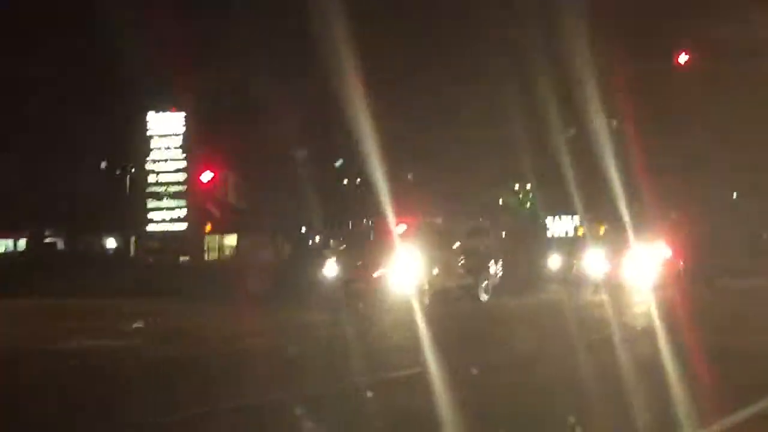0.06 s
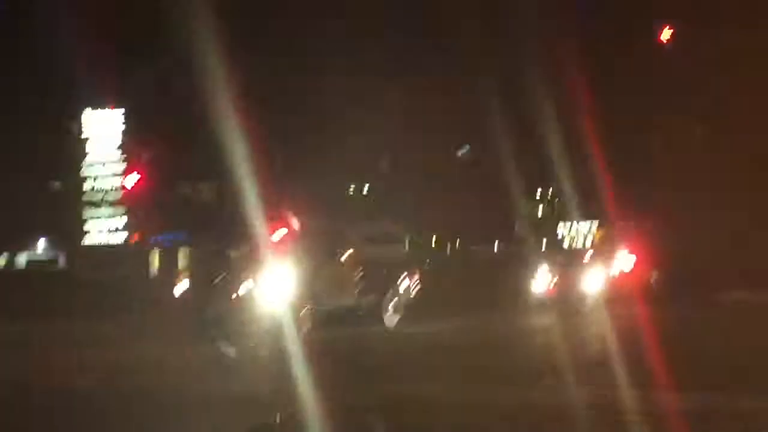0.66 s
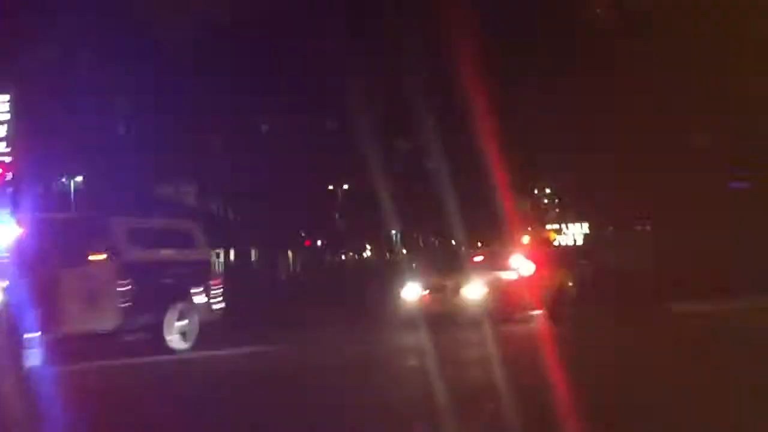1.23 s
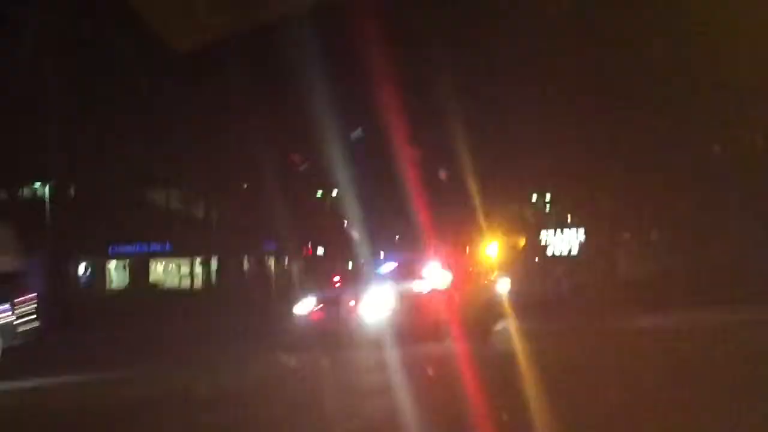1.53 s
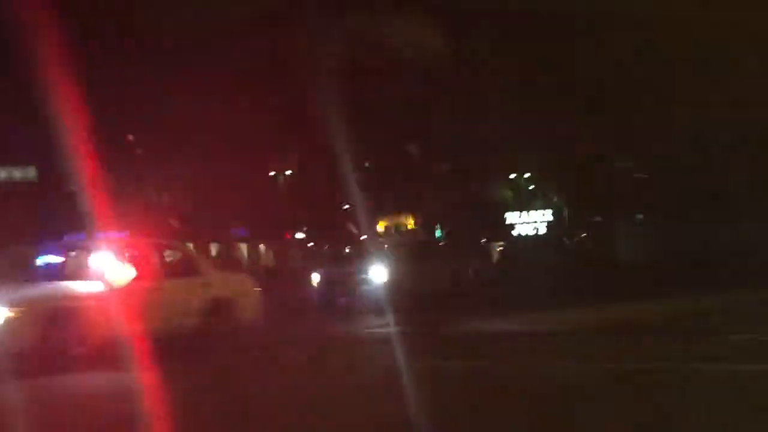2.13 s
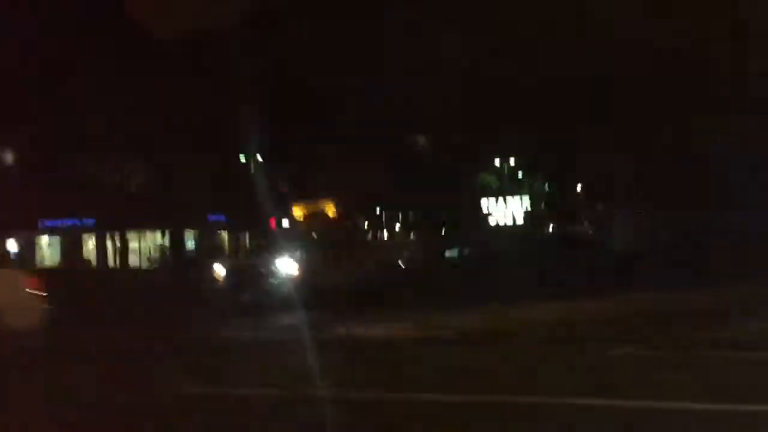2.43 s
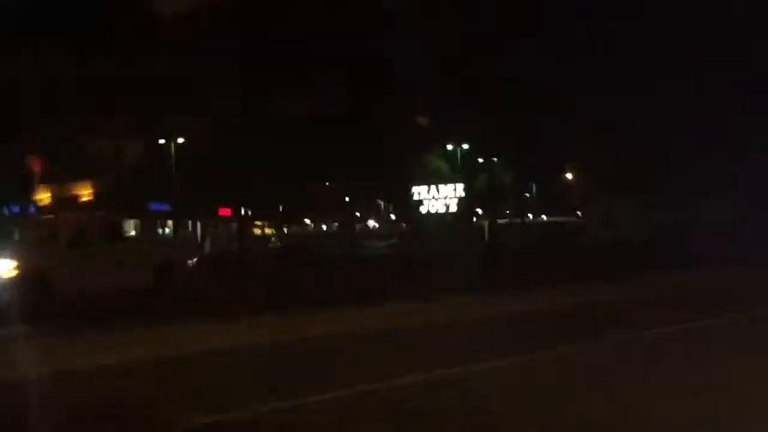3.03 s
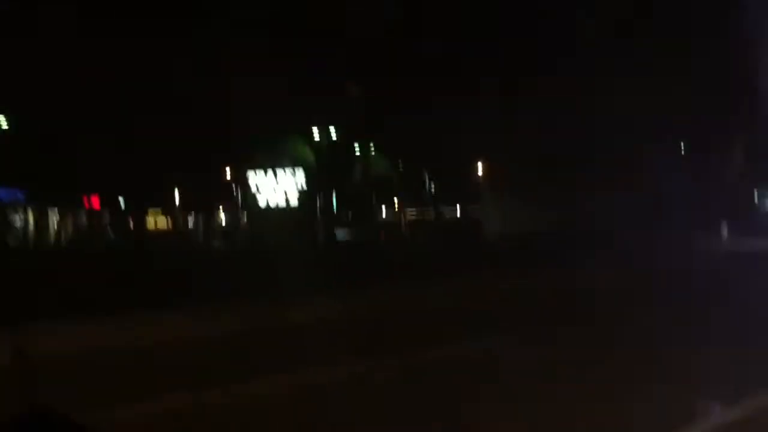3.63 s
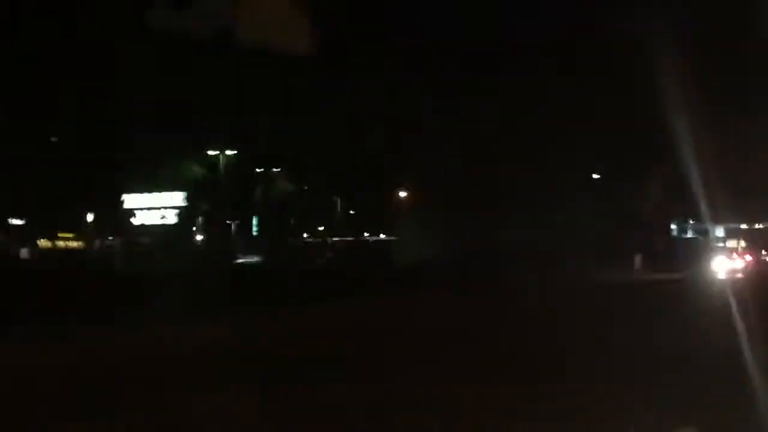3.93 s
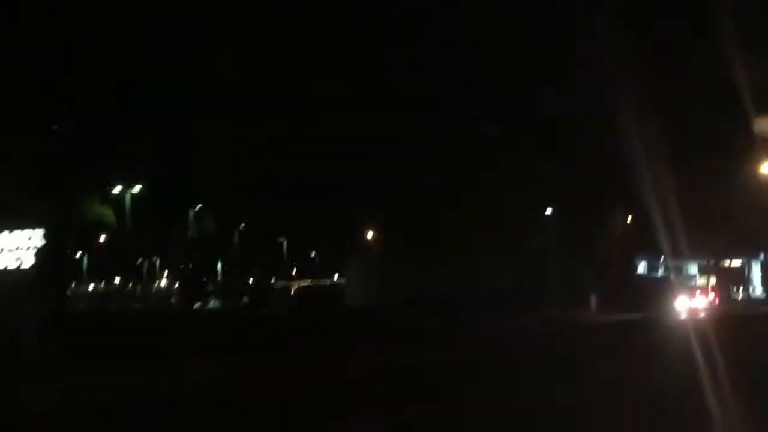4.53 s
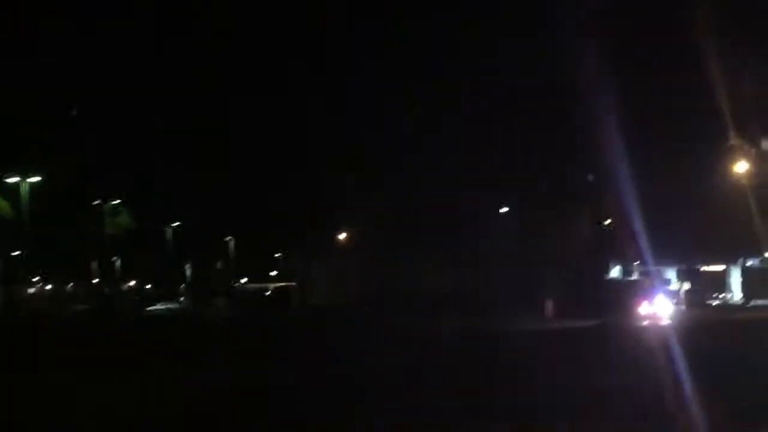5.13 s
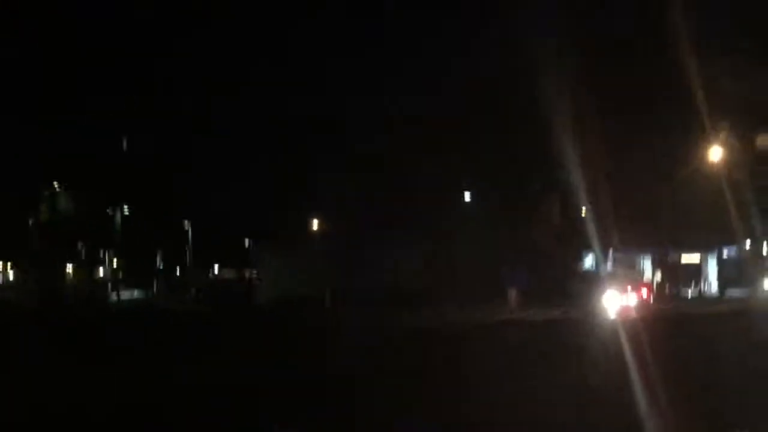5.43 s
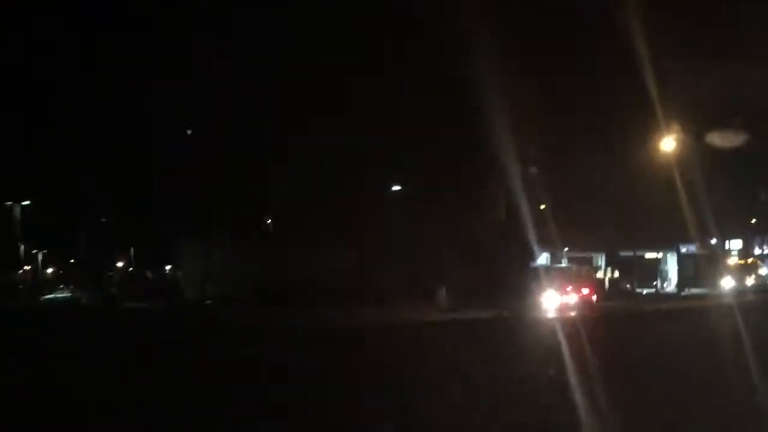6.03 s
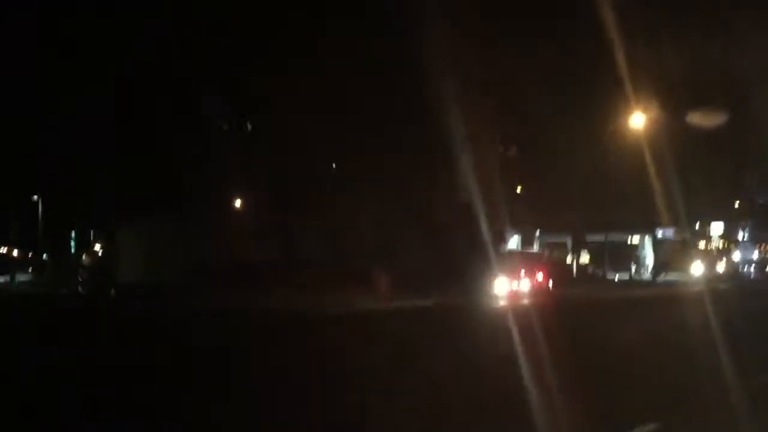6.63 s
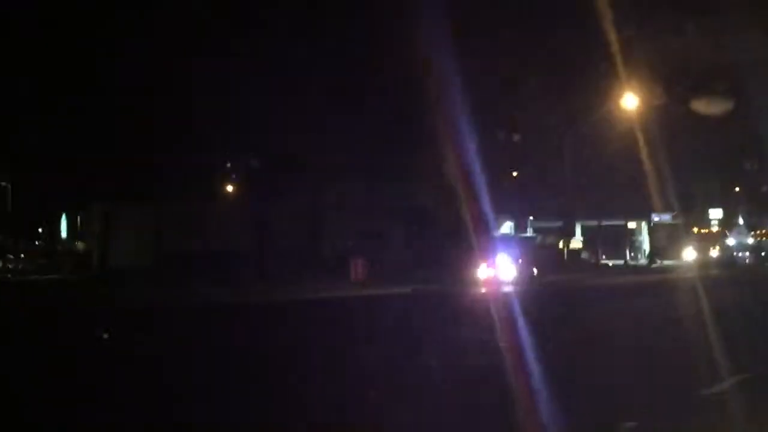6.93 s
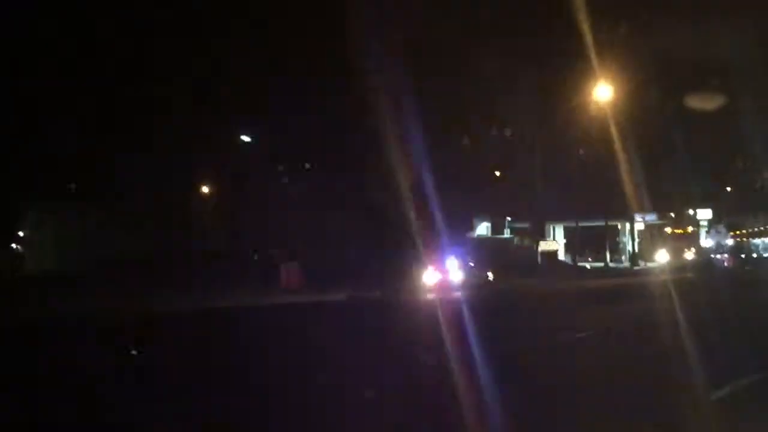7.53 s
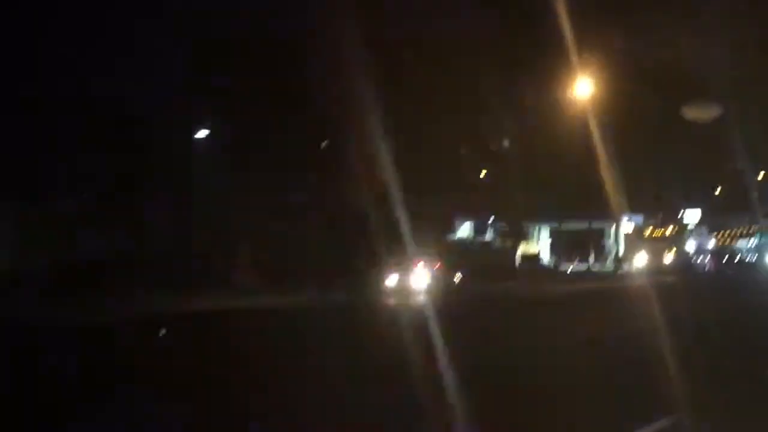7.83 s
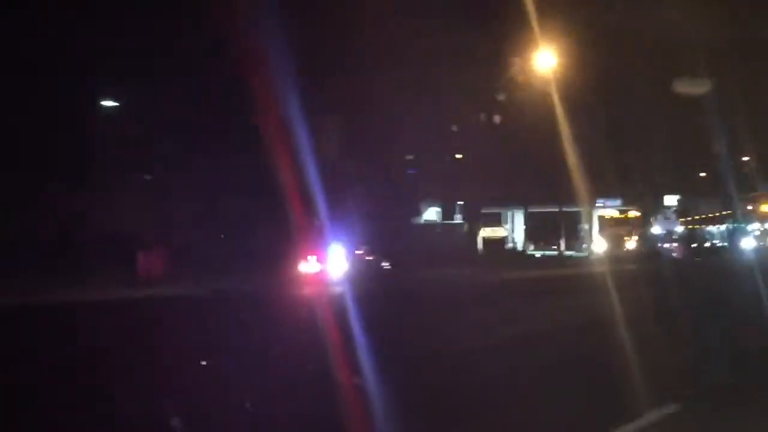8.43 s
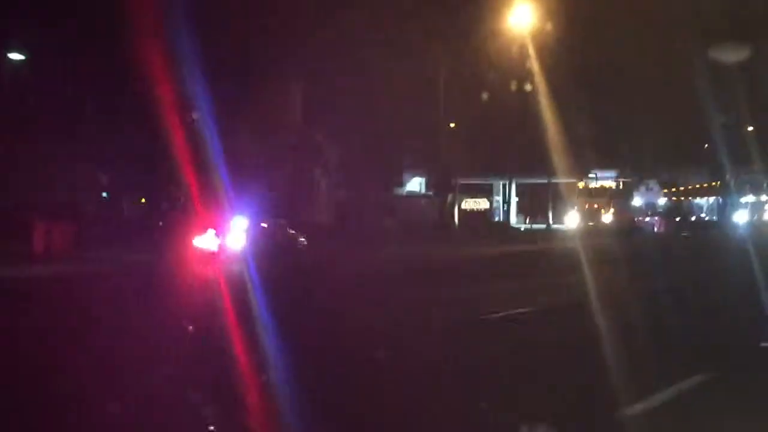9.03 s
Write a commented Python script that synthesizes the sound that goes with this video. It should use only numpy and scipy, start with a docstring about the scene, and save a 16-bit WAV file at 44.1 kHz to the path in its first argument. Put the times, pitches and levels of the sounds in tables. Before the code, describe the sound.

Inside the cab of a slow diesel truck, the exhaust booms and throbs and the engine clatters over steady road rumble and tyre roar. The engine picks up speed, and an oncoming car hisses past, followed by a much fainter one. A bump then thumps through the cab and rattles loose fittings. The truck drives on, gradually easing off, all heard close on a single phone microphone.

```python
"""A slow diesel truck at night, from inside the cab on one phone microphone. Close up, the exhaust booms and
throbs and the block clatters, pulling up to speed and easing off. Underneath, the road shakes the cab and the
tyres roar; a bump at 3 s makes loose fittings rattle. A car and then a truck of an oncoming convoy hiss past,
5.7 m to the side."""
import sys
import numpy as np
from scipy import signal
from scipy.fft import rfft, irfft, next_fast_len
from scipy.io import wavfile
from scipy.ndimage import uniform_filter1d, map_coordinates

SR = 44100
rng = np.random.default_rng(int(sys.argv[2]) if len(sys.argv) > 2 else 0)


def transcribe(signal):
    """Save signal, clipped to [-1, 1], as a 16-bit WAV file at the path in sys.argv[1]."""
    frames = np.atleast_2d(signal).T
    limited = np.clip(frames, -1, 1)
    pcm = np.round(limited * 32767).astype(np.int16)
    wavfile.write(sys.argv[1], SR, pcm)


N = 408807
TIME = np.arange(N) / SR

# exhaust drone in the cab, deep under load, thinner when coasting: t/s, firing tone/dB, its octave/dB
EXHAUST_DRONE = [(0, -22.5, -33), (.3, -21, -30.5), (.9, -21.5, -36), (1.07, -33, -30.5), (1.4, -30, -34.5),
                 (1.8, -26.5, -27.5), (3.0, -27, -26.5), (3.5, -33.5, -31), (4.3, -28, -27.5),
                 (5.6, -35.5, -28), (6.4, -36, -28), (7.6, -35.5, -27), (7.95, -25.5, -27),
                 (8.5, -28, -24.5), (9.27, -24.5, -30.5)]
# weaker exhaust lines: multiple of the firing rate, pulling away/dB, rolling/dB
EXHAUST_OVERTONES = [(1.5, -45, -46), (2.5, -55.5, -56), (3, -43.5, -50.5), (3.5, -37.5, -53.5),
                     (4, -42.5, -46.5), (5, -58, -52.5), (6, -51, -60), (6.5, -50.5, -61), (7, -56, -64.5)]
def exhaust(firings, throb_hz=2.89, depth_db=1.5, crest_s=6.39, wobble_rad=0.033):
    """The firing tone and its overtones boom in the cab, a little unsteady; the octave throbs evenly."""
    low_db, octave_db = curves(EXHAUST_DRONE)
    phase = 2 * np.pi * firings
    drone = undb(low_db + .9 * walk(15)) * np.sin(phase + wobble_rad * walk(4.7))
    throb_db = depth_db * np.cos(2 * np.pi * throb_hz * (TIME - crest_s))
    drone += undb(octave_db + throb_db + .6 * walk(9)) * np.sin(2 * phase + wobble_rad * walk(13))
    pulling = np.interp(TIME, [.8, 1.3], [1, 0])
    for multiple, pull_db, roll_db in EXHAUST_OVERTONES:
        db = roll_db + pulling * (pull_db - roll_db) + 1.4 * walk(13)
        drone += undb(db) * np.sin(multiple * phase + 0.18 * walk(9))
    return np.sqrt(2) * drone


# combustion clatter from the seat, following the throttle: t/s, level/dB
CLATTER_LEVEL = [(0, -52), (.17, -56), (.5, -49), (.65, -58), (.8, -49), (1.0, -54), (1.3, -48.5),
                 (1.55, -52.5), (2.2, -48), (2.95, -48.5), (3.3, -58), (3.55, -49.5), (3.85, -47.5),
                 (4.3, -47), (7.2, -46.5), (8.25, -47.5), (8.55, -51.5), (9.27, -49.5)]
# noise that blurs the knocks, least under steady load: t/s, strength relative to the knocks
KNOCK_WASH = [(0, 0.87), (3.9, 0.87), (5.0, .2), (8.3, .15), (8.8, 0.83), (9.27, 0.9)]
# broad spectrum of the engine block: f/Hz, level/dB
BLOCK_SPECTRUM = [(710, -38), (1200, -7), (1550, -3.5), (1810, -6.5), (2040, -4), (2510, -6.5),
                  (2740, -3.5), (3270, -15), (3600, -18.5), (4050, -22.5), (4890, -24), (6580, -31.5),
                  (7230, -32), (8750, -40), (15000, -51)]
# its ringing panels: f/Hz, width/Hz, level/dB
PANEL_MODES = [(1263, 26, -1), (1490, 48, -1), (1976, 64, 6), (2156, 47, 5.5), (2354, 55, 1.5),
               (2691, 63, -13), (3172, 146, -7.5), (3789, 27, -18), (3970, 72, -11.5), (4550, 140, -20),
               (5050, 70, -26), (5460, 99, -19.5), (5663, 60, -24.5), (6040, 70, -19.5), (6330, 42, -20.5),
               (6630, 55, -20), (6810, 55, -24), (7250, 65, -27), (7630, 65, -29), (7900, 50, -30),
               (8470, 80, -27.5), (9000, 60, -30.5), (9300, 50, -32), (9733, 60, -31), (10034, 60, -37),
               (11200, 160, -41.5), (11283, 110, -41.5), (12166, 120, -43.5), (12424, 80, -42)]
def clatter(firings, knock_db=(0, -12, -10), scatter_db=1.9, jitter_s=.0003):
    """Each firing knocks once and the valve gear twice; the block and its panels ring."""
    beat = firings * len(knock_db)
    starts = np.flatnonzero(np.diff(np.floor(beat)))
    lateness, strength = rng.standard_normal((len(starts), 2)).T
    starts = np.clip(starts + (lateness * jitter_s * SR).astype(int), 0, N - 1)
    strikes = np.zeros(N)
    strikes[starts] = undb(np.resize(knock_db, len(starts)) + scatter_db * strength)
    wash, = curves(KNOCK_WASH)
    trails = unit(noise() * np.exp(-(beat % 1) / 1.5))
    knocks = unit(unit(strikes) + wash * trails)
    # the injectors spurt once a firing, with a weaker rebound; their hiss feeds the highest panels
    phase = 2 * np.pi * (firings - .25)
    spurts = 1 + 0.36 * np.cos(phase) + 0.13 * np.cos(2 * phase)
    spurts *= undb(walk(45) + 0.5 * walk(9))
    hiss = unit(noise() * spurts)
    panels = sum((-1) ** k * undb(db) * ring(knocks if hz < 2900 else hiss, hz, width)
                 for k, (hz, width, db) in enumerate(PANEL_MODES))
    block = colour(noise() * spurts, BLOCK_SPECTRUM)
    # the panels ring most clearly when the knocks are clean
    metal = undb(1.5 * (.5 - wash)) * unit(panels) + undb(-5.5) * unit(block)
    treble = signal.sosfiltfilt(signal.butter(2, 4500, "high", fs=SR, output="sos"), metal)
    level_db, = curves(CLATTER_LEVEL)
    lift_db = 3 - 0.02 * (level_db + 49.5) + 0.67 * walk(4.9)  # the treble stands out and flickers
    return undb(level_db) * (metal + (undb(lift_db) - 1) * treble)


# body shake, set by how uneven the road is: t/s, level/dB
SHAKE_LEVEL = [(0, -26.5), (1.1, -27), (1.7, -25), (2.1, -32), (3.4, -23.5), (3.85, -38), (4.3, -25),
               (5.7, -30.5), (6.25, -24.5), (7.05, -31), (7.85, -25), (8.6, -27), (9.27, -30)]
# cab panels rumbling around the microphone: t/s, level/dB
PANEL_RUMBLE = [(0, -30.5), (1.0, -30.5), (3.0, -29), (3.8, -29), (5.5, -30), (8.2, -29), (9.27, -29.5)]
# tyre roar from below, following the coarseness of the asphalt: t/s, level/dB
ROAR_LEVEL = [(0, -44.5), (.9, -44), (1.45, -43), (1.95, -43.5), (3.05, -42.5), (3.7, -43), (4.35, -42),
              (5.65, -43.5), (6.8, -43.5), (8.45, -44), (9.27, -42)]
# the tread singing on some stretches: t/s, level/dB
TREAD_LEVEL = [(0, -53), (1.1, -59), (1.48, -48), (1.85, -59), (2.22, -51), (2.8, -54), (3.25, -50.5),
               (3.6, -55), (4.45, -51), (5.0, -52.5), (5.6, -60), (7.3, -51.5), (7.8, -56), (9.27, -56)]
# spectra of the shake, rumble and roar: f/Hz, level/dB
SHAKE_SPECTRUM = [(22, -33), (30, -23), (38, -2.5), (45, 1), (54, 1), (70, -11.5), (90, -14.5), (130, -14),
                  (220, -50.5)]
RUMBLE_SPECTRUM = [(50, -21), (75, 3), (100, -0.5), (122, 7), (162, 5), (195, -2), (270, -3.5), (305, -5.5),
                   (365, -5.5), (415, -15), (500, -27), (800, -51)]
ROAR_SPECTRUM = [(250, -17), (420, -1.5), (530, -1), (640, 1), (870, -1.5), (1100, -3.5), (1250, -5.5),
                 (1400, -7.5), (1650, -5.5), (2200, -12), (4000, -21.5), (7500, -46), (14000, -51.5)]
def road(tread_hz=878, tread_width_hz=190, patches_per_s=2.38):
    """The body shakes on its springs, the cab panels rumble, the tyres roar and their tread sings."""
    shake_db, = curves(SHAKE_LEVEL)
    rumble_db, = curves(PANEL_RUMBLE)
    roar_db, = curves(ROAR_LEVEL)
    tread_db, = curves(TREAD_LEVEL)
    shake = colour(noise(), SHAKE_SPECTRUM)
    shake /= (uniform_filter1d(shake ** 2, size=4000) + 0.033) ** 0.15  # dampers restrain the sway
    rumble = colour(noise(), RUMBLE_SPECTRUM)
    roar = colour(noise() * undb(0.67 * walk(18)), ROAR_SPECTRUM)
    tread = narrow_noise(tread_hz, tread_width_hz)
    rumble_db += 0.28 * walk(patches_per_s)
    return undb(shake_db) * shake + undb(rumble_db) * rumble + undb(roar_db) * roar + undb(tread_db) * tread


# blows up through the suspension: t/s, boom/dB, f/Hz, t60/s, judder/dB, judder t60/s
BUMP_JOLTS = [(3.080, -14.5, 54, 0.27, -26, 0.34), (3.195, -19, 212, 0.14, -22.5, .18),
              (3.241, -5, 49.3, 0.41, -22.5, .22), (3.298, -9.5, 121.3, 0.16, -24, 0.18),
              (3.428, -16.5, 269, .14, -26, 0.18), (3.470, -9, 48.6, 0.37, -24, .18),
              (3.506, -17.5, 166, 0.14, -22, .12), (3.555, -14.5, 62, 0.16, -28.5, .1),
              (3.692, -8.5, 58, 0.17, -28, .1)]
# cab panels shaken by a jolt: f/Hz, level/dB
JUDDER_SPECTRUM = [(60, -5), (100, 6), (160, 7), (240, -3.5), (290, -5.5), (400, -26.5)]
def jolts(rise_s=0.016):
    """The wheels hit a bump: the tyres cushion the blow, the cab booms and its panels judder."""
    boom, judder = np.zeros((2, N))
    for s, db, hz, t60, judder_db, judder_t60 in BUMP_JOLTS:
        push = np.clip((TIME - s) / rise_s, 0, 1)
        boom += undb(db) * push * fade(s, t60) * np.sin(2 * np.pi * hz * (TIME - s))
        judder += undb(judder_db) * push * fade(s, judder_t60)
    return boom + colour(judder * noise(), JUDDER_SPECTRUM)


# brief surges of the cab's low boom: crest t/s, peak level/dB
LOW_RUMBLE_SURGES = [(0.127, -24), (0.446, -16), (0.591, -30), (0.871, -16), (1.131, -19.5), (1.451, -20),
                     (1.63, -18), (2.719, -20), (4.28, -21), (4.57, -35), (7.521, -20), (7.821, -17)]
def rumble_surges(length_s=0.15, boom_hz=46.5, detune=0.053):
    """The cab's low boom surges for a few cycles, rising and falling smoothly."""
    surges = np.zeros(N)
    for s, db in LOW_RUMBLE_SURGES:
        hz = boom_hz * (1 + detune * rng.standard_normal())
        arch = np.cos(np.pi * np.clip((TIME - s) / length_s, -.5, .5)) ** 2
        surges += undb(db) * arch * np.sin(2 * np.pi * hz * (TIME - s))
    return surges


# loose fittings near the microphone: t/s, level/dB, treble corner/Hz, metal ring/dB, t60/s, rise/s
FITTING_RATTLES = [(0.076, -48.5, 7500, -19, .05, 0.0098), (.287, -51, 8000, -30, .15, 0.014),
                   (.372, -48, 4500, -34, .12, 0.012), (0.400, -45.5, 12500, -24, .025, .002),
                   (.453, -51.5, 9500, -23, .18, .022), (.562, -49.5, 7000, -25, 0.093, 0.011),
                   (.845, -49, 8000, -25, 0.12, .018), (1.63, -54, 10000, -23, 0.092, .008),
                   (1.769, -45.5, 15000, -18, 0.075, .010), (2.132, -48, 4500, -30, .05, 0.009),
                   (2.259, -33.5, 5000, -30, 0.022, .002), (2.266, -35.5, 4400, -30, .06, .003),
                   (3.112, -48, 7000, -12, 0.047, .003), (3.142, -59, 9000, 1, .03, .002),
                   (3.246, -38, 15000, -16, 0.048, .001), (3.257, -41.5, 13900, -24, 0.17, .002),
                   (3.276, -37, 9000, -19, 0.049, .001), (3.289, -44, 14000, -5, 0.035, .001),
                   (3.300, -47, 12000, -21, 0.13, .001), (3.332, -49, 11000, -17, 0.083, .002),
                   (3.352, -49, 9000, -13, 0.065, .002), (3.91, -53.5, 9500, -29, 0.36, .03),
                   (7.055, -53, 13000, -20, 0.14, 0.017), (8.145, -49.5, 8000, -26, 0.13, .035)]
# their chatter: f/Hz, level/dB
FITTING_SPECTRUM = [(500, -3), (1000, 10.5), (2000, 4), (4000, 0.5), (6000, -3.5), (9000, -9),
                    (12500, -7.5), (15000, -7.5)]
def rattles(firings, buzz=0.66, slow_rise_s=.015):
    """Light shakes rustle and buzz with the engine, hard blows are sudden; a metal part rings along."""
    grit = unit(noise() * undb(1.3 * walk(900)))
    chatter, metal = np.zeros((2, N))
    for s, db, corner_hz, ring_db, t60, rise_s in FITTING_RATTLES:
        rise = np.maximum(TIME - s, 0) / rise_s
        blow = undb(db) * np.where(TIME < s + rise_s, rise, fade(s + rise_s, t60))
        blow *= 1 + buzz * min(rise_s / slow_rise_s, 1) * np.cos(2 * np.pi * (firings - .25))
        contact = signal.butter(4, corner_hz, fs=SR, output="sos")
        chatter += signal.sosfilt(contact, blow * grit)
        metal += blow * undb(ring_db)
    return colour(chatter, FITTING_SPECTRUM) + metal * narrow_noise(hz=9000, width=700)


# vehicles in the opposite lane, a car then a truck: abreast t/s, level there/dB, closing speed/(m/s), pulse
# depth 0-1
ONCOMING_PASSES = [(2.09, -47, 13, 0), (2.92, -65.5, 14, 0.6)]
# their tyre hiss, from inside the cab: f/Hz, level/dB
HISS_SPECTRUM = [(900, -14.5), (2000, 0.5), (3000, 1.5), (4500, -8.5), (6200, -4), (8000, -13.5),
                 (9600, -14.5), (12300, -19.5), (13500, -21), (15000, -27.5)]
def oncoming_traffic(firings, lane_gap_m=5.7, ahead_db_per_m=3, behind_db_per_m=0.84):
    """Gritty tyre hiss swells and fades with distance; the passing truck's hiss pulses with our own engine."""
    gain = 0
    for s, db, speed, depth in ONCOMING_PASSES:
        along_m = speed * (TIME - s)
        # the cab screens the hiss, most while the car is still ahead
        screened_db = np.abs(along_m) * np.where(along_m < 0, ahead_db_per_m, behind_db_per_m)
        pulse = 1 + depth * np.cos(np.pi * firings)
        gain += pulse * undb(db - screened_db) * lane_gap_m / np.hypot(along_m, lane_gap_m)
    grit = noise() * undb(1.9 * walk(700) + 1.1 * walk(29))
    return gain * colour(grit, HISS_SPECTRUM)


# cab trim, close by: t/s, length/s, f/Hz, level/dB, loss per overtone/dB
TRIM_CREAKS = [(0.076, 0.021, 842, -34, 15), (0.08, 0.021, 990, -40, 13)]
def creaks(relative_width=0.058):
    """Trim slips for a moment and gives a rough, short squeak."""
    squeaks = np.zeros(N)
    for s, length, hz, db, slope_db in TRIM_CREAKS:
        slip = rng.standard_normal(4096)
        start, count = int(s * SR), int(length * SR)
        width = hz * relative_width
        partials = [ring(ring(slip, k * hz, width), k * hz, width)[-count:] for k in (1, 2, 3)]
        tone = sum(undb(-slope_db * k) * unit(partial) for k, partial in enumerate(partials))
        squeaks[start:start + count] += undb(db) * np.hanning(count) * tone
    return squeaks


# a tap on a small piece of metal in the cab: t/s, level/dB, pitch ratio
METAL_TAPS = [(1.781, -44.5, 0.97)]
# its modes: f/Hz, level/dB, t60/s
METAL_MODES = [(4050, -6, .06), (4440, -1, 0.057), (5070, -6, .08), (9000, -7, 0.055), (10100, -14, .035),
               (13900, -12, .04)]
def clink():
    """A light tap rings a few short metal modes."""
    return sum(undb(tap_db + db) * fade(s, t60) * np.sin(2 * np.pi * hz * pitch * (TIME - s))
               for s, tap_db, pitch in METAL_TAPS for hz, db, t60 in METAL_MODES)


# faint hums behind the engine sound: t/s, low hum/dB, middle hum/dB, high hum/dB
HUM_LEVELS = [(0, -45, -49, -64.5), (.9, -38.5, -53, -68), (1.45, -53.5, -51.5, -69), (1.9, -55, -69, -63),
              (3.5, -58, -61, -63), (4.0, -43, -54, -63), (5.05, -41.5, -50, -54), (5.5, -47.5, -64, -54.5),
              (6.6, -49, -62, -54), (8.1, -56, -57.5, -52), (8.8, -40, -56, -55), (9.27, -45, -54, -56)]
# their bands: f/Hz, width/Hz
HUM_BANDS = [(338, 70), (477, 28), (690, 95)]
def panel_hum():
    """Three narrow, wavering hums come and go in the cab."""
    return sum(undb(db) * narrow_noise(*band) for db, band in zip(curves(HUM_LEVELS), HUM_BANDS))


def undb(db):
    """Decibels to gain."""
    return 10 ** (np.asarray(db) / 20)


def unit(x):
    """Scale to rms 1."""
    return x / np.sqrt(np.mean(x ** 2))


def curves(table):
    """The columns of a table, joined by straight lines in time."""
    s, *columns = np.transpose(table)
    return [np.interp(TIME, s, c) for c in columns]


def noise():
    """White noise."""
    return rng.standard_normal(N)


def walk(rate):
    """Smooth random drift with spread 1, changing about rate times a second."""
    knots = rng.standard_normal(4096)
    return unit(map_coordinates(knots, [TIME * rate], order=3, mode="wrap"))


def colour(x, points):
    """Give x a spectrum of (f/Hz, level/dB) points; white noise keeps its level."""
    hz, db = np.transpose(points)
    size = next_fast_len(N)
    bins = np.maximum(np.arange(size // 2 + 1) * SR / size, 1)
    gain = undb(np.interp(np.log(bins), np.log(hz), db))
    gain *= np.minimum(bins / hz[0], 1) ** 2 * np.minimum(hz[-1] / bins, 1) ** 2
    return irfft(rfft(x, size) * unit(gain), size)[:N]


def ring(x, hz, width):
    """One resonance, gain 1 at its centre."""
    return signal.lfilter(*signal.iirpeak(hz, hz / width, fs=SR), x)


def narrow_noise(hz, width):
    """Noise passed twice through a resonance: a wavering tone of rms 1."""
    return unit(ring(ring(noise(), hz, width), hz, width))


def fade(s, t60):
    """A sudden start at s that dies away by 60 dB in t60."""
    age = TIME - s
    return (age >= 0) * np.exp(-np.log(1000) * np.clip(age / t60, 0, 2))


# engine speed: t/s, firing rate/Hz
FIRING_RATE = [(0, 59.6), (.4, 62.6), (.9, 66.1), (1.3, 68), (1.9, 70.8), (3.0, 70.31), (3.7, 69.8),
               (4.5, 69.1), (5.5, 68), (6.5, 67.25), (7.3, 66.25), (8.2, 65.2), (8.8, 64), (9.27, 62.4)]
def scene():
    """Engine, road and passing traffic, in mono from one spot in the cab."""
    firing_hz, = curves(FIRING_RATE)
    firings = np.cumsum(firing_hz) / SR
    engine = exhaust(firings) + clatter(firings) + panel_hum()
    driving = engine + road() + rumble_surges() + oncoming_traffic(firings)
    return (driving + jolts() + rattles(firings) + clink() + creaks())[None]


def record(dry, top_hz=15100):
    """The phone in the cab cuts the highest treble."""
    return signal.sosfilt(signal.ellip(8, .2, 80, top_hz, fs=SR, output="sos"), dry)


dry = scene()
out = record(dry)
transcribe(out)
```